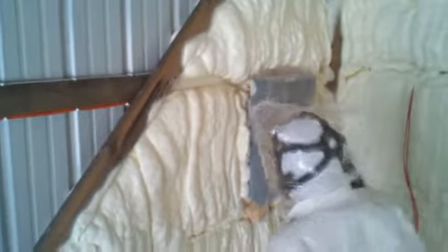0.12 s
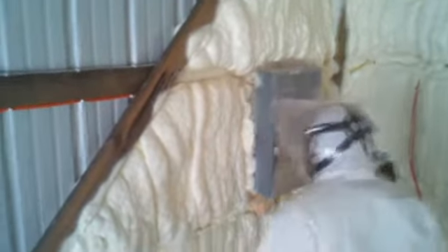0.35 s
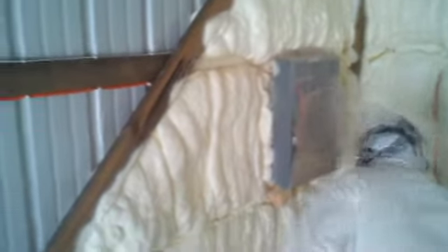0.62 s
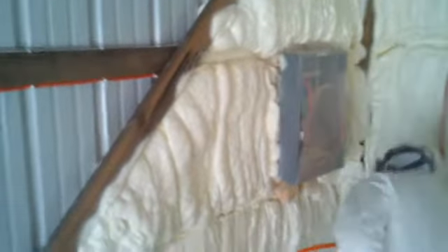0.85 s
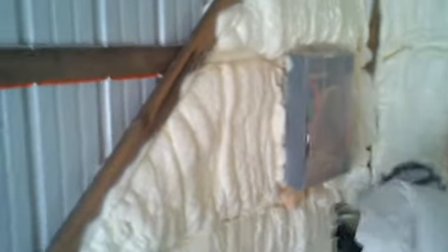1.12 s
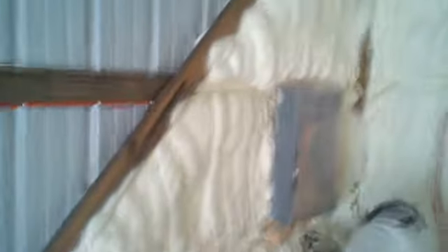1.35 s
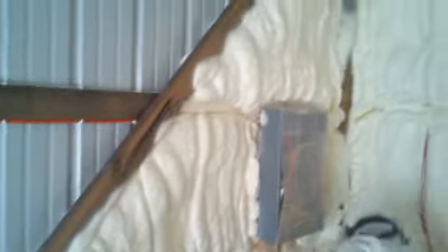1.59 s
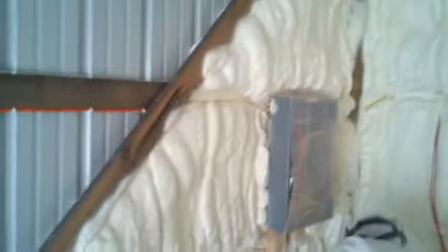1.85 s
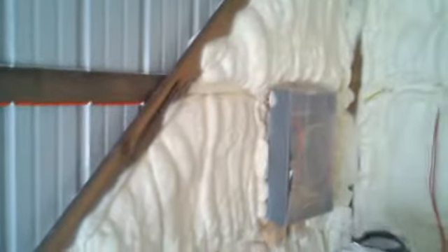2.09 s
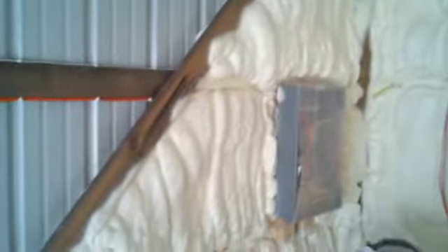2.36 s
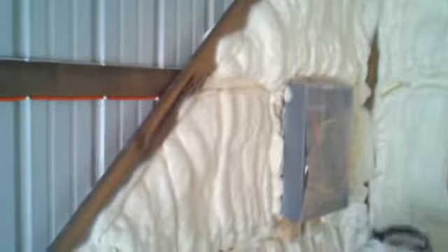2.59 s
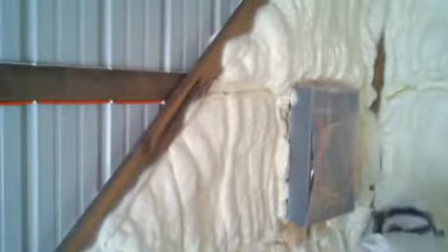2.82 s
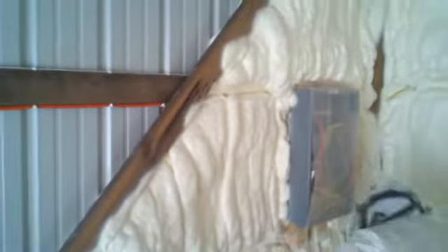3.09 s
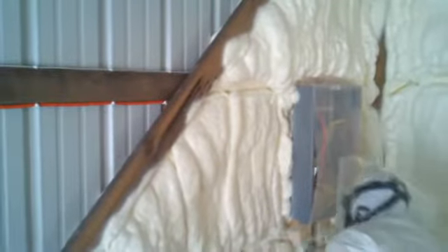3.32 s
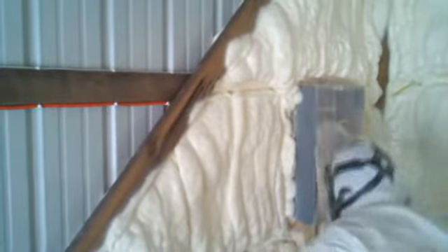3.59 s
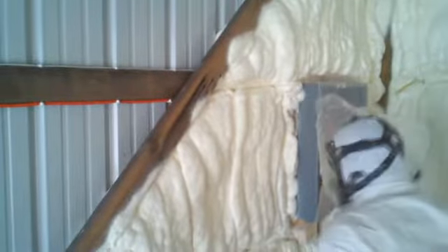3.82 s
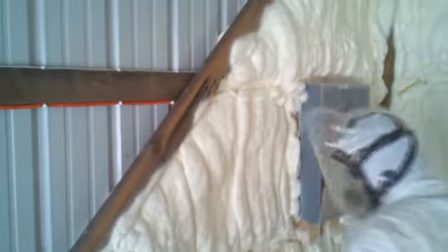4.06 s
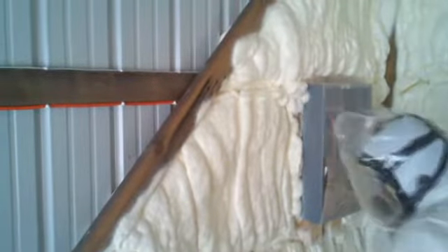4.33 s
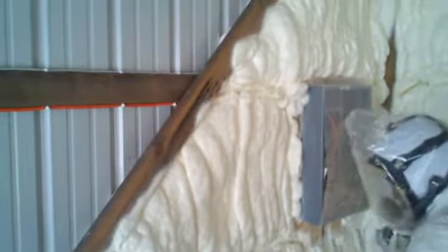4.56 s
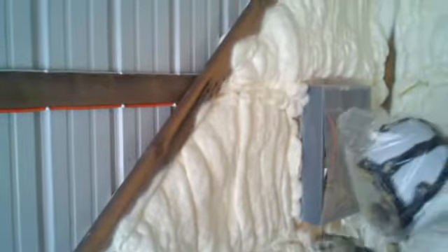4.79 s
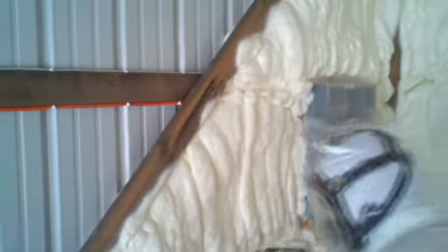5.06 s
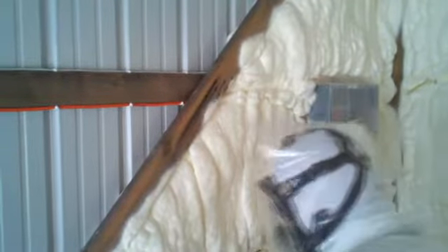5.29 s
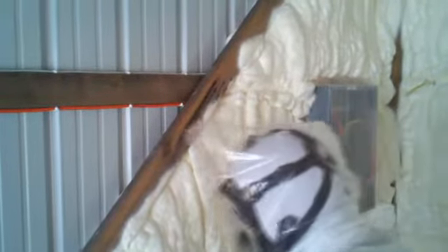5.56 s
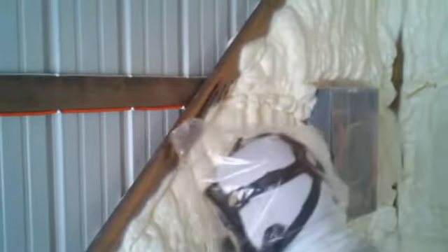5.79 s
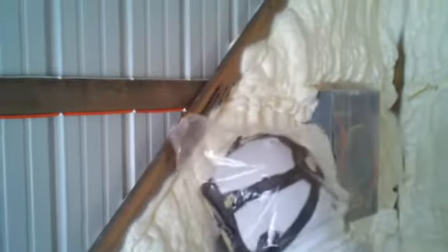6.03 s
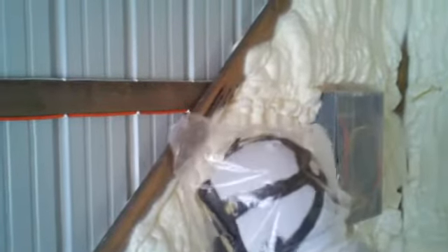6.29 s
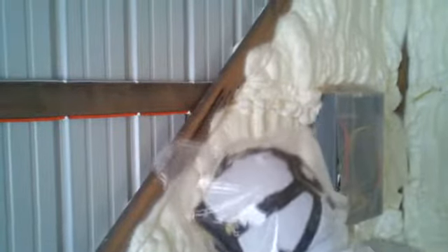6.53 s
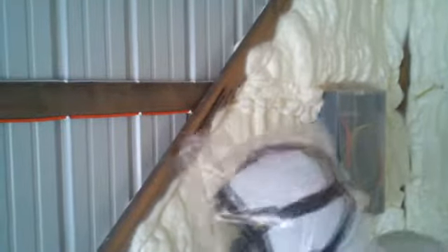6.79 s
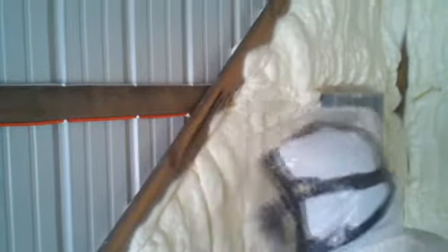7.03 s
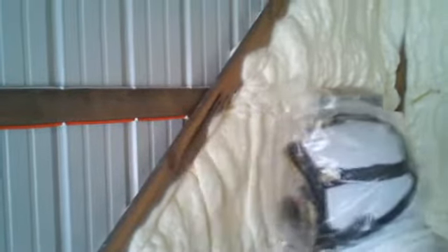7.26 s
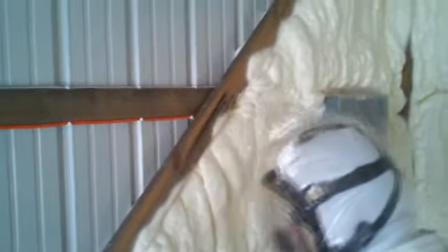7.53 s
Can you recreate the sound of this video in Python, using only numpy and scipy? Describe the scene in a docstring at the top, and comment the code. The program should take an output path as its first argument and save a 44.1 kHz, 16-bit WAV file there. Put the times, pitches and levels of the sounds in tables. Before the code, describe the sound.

Steady high compressed-air hiss close to a small camera, over low engine hum, pump tones and soft rumble from outside. Early on, three rapid foam puffs sputter; later a double burst, then a firmer series with sharp valve clacks, the hardest a little past five seconds. The hiss sags after some bursts and swells back. The room sounds dry and padded, the stereo wide and slightly phasey.

```python
"""Spray gun in a foam-lined shed

Close by, a spray gun leaks purge air in a bright hiss: flickering bands of noise that spit, sag and recover.
Trigger pulls throw foam at the wall of the metal shed: lumpy noise bursts, and knocks that ring the gun body.
Outside, an engine and pumps hum: sines on one shaft speed over broad rumble. Once, a short rough squeak.
A small camera hears it with two microphones and widens the image by delayed cross-feed."""
import sys
import numpy as np
from scipy import signal
from scipy.io import wavfile
from scipy.ndimage import uniform_filter1d

SR = 44100
rng = np.random.default_rng(int(sys.argv[2]) if len(sys.argv) > 2 else 0)


def generate_wav(signal):
    """Clip the signal to [-1, 1] and save it as 16-bit WAV at the path in sys.argv[1]."""
    frames = np.transpose(np.atleast_2d(signal))
    scaled = np.clip(frames, -1, 1) * 32767
    pcm = np.round(scaled).astype(np.int16)
    wavfile.write(sys.argv[1], SR, pcm)


def field_ratio(decibels):
    """Amplitude ratio for a level in dB (20 dB per decade); scalars and array-likes work."""
    return 10 ** (np.asarray(decibels, dtype=float) / 20)


N = 336924
STEP = 40   # samples between points of slow chance
ENGINE_CYCLE_HZ = 15.625   # the firing-cycle rate at which the pump tones have their listed pitch

# Likeness of the two microphone ports in a diffuse field. Each row: frequency in Hz, correlation.
PORT_LIKENESS = [(60, 0.56), (130, 0.68), (250, 0.72), (800, 0.58), (1300, 1), (2000, 0.058), (2650, -0.71),
                 (3300, 0.6), (3900, -0.28), (5200, 0.36), (6500, -0.24), (8000, 0.43), (9100, -0.24),
                 (11000, 0.19)]

# Machines outside, over time. Each row: time in seconds, then levels in dB of the hum, the rumble,
# engine order 16, engine order 26 and the main pump tone.
MACHINE_LEVELS = [(0.0, -47, -42.5, -43.5, -63, -49), (0.9, -44, -38.5, -41, -46.5, -48.5),
                  (2.3, -42.5, -39, -38.5, -44, -43), (2.9, -43.5, -39.5, -40.5, -42, -44.5),
                  (3.6, -45.5, -39.5, -46, -40, -45), (4.7, -47, -41, -48, -43.5, -43),
                  (5.1, -49, -40, -51, -44, -49.5), (5.7, -49, -40.5, -52, -42.5, -47.5),
                  (6.1, -51, -42.5, -55, -48.5, -48.5), (7.0, -50.5, -42.3, -49, -54, -45.5),
                  (7.64, -46, -40, -56, -50, -48.5)]
# Engine speed, which the pumps follow. Each row: time in seconds, firing cycles per second.
ENGINE_SPEED = [(0, 15.597), (2.0, 15.59), (2.9, 15.6), (3.15, 15.65), (5.9, 15.657), (6.3, 15.715),
                (7.64, 15.735)]
# Fainter engine tones. Each row: multiple of the cycle, level in dB over the hum,
# left-right balance in dB, radians by which the left lags.
ENGINE_ORDERS = [(4, -12, -2, 1.8), (8, 0, -4, .9), (12, -12, -4, .2), (20, -14, 0, .15), (24, -9, 0, 0),
                 (32, -12, 5, .3), (34, -12, -2, 0), (36, -9, 5, -.5), (40, -12, 0, .1), (47, -12, 2, .3),
                 (60, -15, 1, 0)]
# Fainter pump tones. Each row: frequency in Hz, level in dB over the hum,
# left-right balance in dB, radians by which the left lags.
FAINT_PUMP_TONES = [(142.7, -13.5, -4, .45), (285.3, -12, 2, .3)]
# Fade of the load orders. Each row: time in seconds, level in dB.
LOAD_ORDER_FADE = [(0, -2.5), (1.2, -1.7), (2.9, -5.4), (3.5, -4), (7.64, -8)]
# Spectrum of the machine rumble. Each row: frequency in Hz, relative density in dB per Hz.
RUMBLE_SPECTRUM = [(35, -22), (70, -10.5), (130, -10), (220, -2), (380, 2), (600, -9.5), (1000, -9.5),
                   (2000, -15), (3000, -27)]

# Slow level of the air jet as the gun moves. Each row: time in seconds, hiss level in dB.
JET_LEVEL = [(0.0, -23), (1.0, -22.5), (2.2, -22), (2.8, -22.5), (3.8, -21.5), (4.8, -23), (5.9, -21),
             (6.6, -24.5), (6.94, -22.5), (7.64, -22.5)]
# Spectrum of the air jet. Each row: frequency in Hz, relative density in dB per Hz.
HISS_SPECTRUM = [(1500, -18.5), (2500, -11), (4000, -13), (5500, -11), (7000, -7.5), (8500, -3.5),
                 (11000, -3), (14000, -1.5)]
# Spits of air, each with a sag of the hiss. Each row: time in seconds, spit in dB,
# sag in dB (negative swells), recovery time constant in seconds.
AIR_SPITS = [(1.40, 3.5, 6.5, .08), (1.54, 5, 1.5, 0.1), (3.29, 3.5, 4.5, 0.13), (4.85, 3.5, -3.3, .1),
             (4.99, 1, 4.5, 0.36), (5.35, 4, 5, 0.54), (5.97, 1.5, 3, 0.54)]

# Puffs of foam at the wall. Each row: start in seconds, held time in seconds, thud level in dB,
# spatter level in dB, sag in dB while held (negative swells).
FOAM_PUFFS = [(1.228, .11, -37.5, -39, 9), (1.351, 0.091, -35.5, -32.5, 8), (1.49, 0.045, -40, -36.5, 7),
              (3.175, 0.068, -34.5, -36, 10), (3.245, 0.072, -37, -27, 9.5), (4.834, 0.068, -40, -32.5, 9),
              (4.902, 0.083, -34.5, -35, -2.5), (5.20, .05, -50, -39, -0.5),
              (5.256, 0.14, -29.5, -27.5, 10.5), (5.729, 0.1, -40.5, -48, -4),
              (5.851, 0.07, -31.5, -28.5, 0.5)]
# Spectrum of the foam's dull thud. Each row: frequency in Hz, relative density in dB per Hz.
THUD_SPECTRUM = [(330, -2.5), (480, -9), (800, -5), (1150, -11.5)]
# Spectrum of the foam's spatter. Each row: frequency in Hz, relative density in dB per Hz.
SPATTER_SPECTRUM = [(1150, 3), (1600, 7.5), (2300, 1.5), (3000, -0.5), (3800, -10)]

# Knocks of the valve. Each row: time in seconds, click level in dB.
VALVE_KNOCKS = [(1.351, -34), (3.175, -33), (3.245, -25), (4.843, -24), (4.902, -19), (5.256, -12.5),
                (5.851, -20)]
# Short modes of the gun body. Each row: frequency in Hz, level in dB, 60 dB decay time in seconds.
GUN_BODY_MODES = [(600, 0, .008), (1550, -2, .006), (2400, -10, .005)]

# Narrow bands missing from the centre. Each row: frequency in Hz, half width in Hz,
# flicker of the width in dB, wander in Hz.
CENTRE_HOLES = [(2650, 180, 3.5, 60), (5200, 110, 7, 200), (7800, 35, 9, 120), (10400, 35, 9, 150),
                (13050, 35, 8, 120)]
# Narrow bands missing from the left-right difference. Each row: frequency in Hz, half width in Hz,
# flicker of the width in dB, wander in Hz.
WIDTH_HOLES = [(1270, 110, 3, 25), (3930, 190, 2.5, 40), (6550, 210, 3, 50), (9120, 190, 3, 50),
               (11650, 170, 5, 180)]


def rms_one(x):
    """Scale to rms 1."""
    return x / np.sqrt(np.mean(x ** 2) + 1e-20)


def in_time(rows):
    """Columns of a curve at every sample."""
    times, *columns = np.transpose(rows)
    return [np.interp(np.arange(N) / SR, times, column) for column in columns]


def at_hz(points, hz):
    """Read a table on a log-frequency axis."""
    table_hz, values = np.transpose(points)
    return np.interp(np.log(hz), np.log(table_hz), values)


def drift(rate):
    """Slow chance of spread 1, one point per STEP: noise through a double one-pole low-pass at rate Hz."""
    r = np.exp(-2 * np.pi * STEP * rate / SR)
    slow = signal.lfilter([1], [1, -2 * r, r * r], rng.standard_normal(N // STEP + 2002))
    return rms_one(slow[2000:])     # without the settling of the filter


def fine(slow):
    """Slow points read at every sample."""
    return np.interp(np.arange(N) / STEP, np.arange(len(slow)), slow)


def delayed(x, lag_s):
    """Read a signal later, between samples."""
    return np.interp(np.arange(N) - lag_s * SR, np.arange(N), x)


def banded_noise(spectrum, count, shared_db, own_db, rate):
    """Bands of stereo noise, each with its level, likeness and flicker; rms 1."""
    out, together = 0, drift(rate)
    edges = np.geomspace(spectrum[0][0], spectrum[-1][0] * 1.166, count + 1)
    white = rng.standard_normal((2, 2, N))      # neighbouring bands get unrelated noise
    for k, (low, high) in enumerate(zip(edges, edges[1:])):
        band = signal.butter(2, [low, high], "band", fs=SR, output="sos")
        mid, side = signal.sosfilt(band, white[k % 2])
        hz = np.sqrt(low * high)
        alike = np.clip(at_hz(PORT_LIKENESS, hz), -1, 1)
        flicker_db = shared_db * together + own_db * drift(rate)
        gain = fine(field_ratio(at_hz(spectrum, hz) + flicker_db))
        out = out + gain * (np.sqrt(1 + alike) * mid + np.sqrt(1 - alike) * side * [[1], [-1]])
    return rms_one(out)


def tone(phase, level_db, pan_db, lag, waver_db):
    """A wavering sine that reaches the two ports with its own balance and phase."""
    sides = np.array([[1], [-1]]) / 2
    waver = fine(field_ratio(waver_db * drift(2.07)))
    return np.sqrt(2) * field_ratio(level_db + pan_db * sides) * waver * np.sin(phase - lag * sides)


def load_orders(turn):
    """Under load every order from 22 to 61 shows faintly, and order 27 strongly; levels over the hum."""
    spread_db = 3
    fade_db, = in_time(LOAD_ORDER_FADE)
    comb = 0
    for k in range(22, 62):
        comb = comb + field_ratio(spread_db * rng.standard_normal()) * np.sin(k * turn + rng.uniform(0, 2 * np.pi))
    return field_ratio(-15 + fade_db) * comb + tone(27 * turn, -2 + fade_db, 0., 0., waver_db=0.5)


def machines():
    """Engine orders on one slightly unsteady shaft, pump tones, and broad rumble."""
    pump_main_hz = 369.7
    hum_db, rumble_db, sixteenth_db, twenty_sixth_db, pump_db = in_time(MACHINE_LEVELS)
    cycle_hz, = in_time(ENGINE_SPEED)
    turn = 2 * np.pi * np.cumsum(cycle_hz * (1 + 0.00033 * fine(drift(1.0)))) / SR
    # phase of a 1 Hz pump tone, which follows the engine with an unsteadiness of its own
    pump_turn = 2 * np.pi * np.cumsum(cycle_hz / ENGINE_CYCLE_HZ * (1 + 0.00043 * fine(drift(0.76)))) / SR

    hum = load_orders(turn)
    for k, level_db, pan_db, lag in ENGINE_ORDERS:
        hum += tone(k * turn + rng.uniform(0, 2 * np.pi), level_db, pan_db, lag, waver_db=1.3)
    for hz, level_db, pan_db, lag in FAINT_PUMP_TONES:
        hum += tone(hz * pump_turn, level_db, pan_db, lag, waver_db=2.)

    strong = tone(16 * turn, sixteenth_db, .7, 0., waver_db=.4)
    strong += tone(26 * turn, twenty_sixth_db, .4, 0., waver_db=.4)
    strong += tone(pump_main_hz * pump_turn, pump_db, -3., .2, waver_db=2.2)
    # at two thirds of the main pump tone, beating against order 16
    strong += tone(pump_main_hz * 2 / 3 * pump_turn, -55.5, .7, 0., waver_db=1.)
    rumble = banded_noise(RUMBLE_SPECTRUM, count=10, shared_db=.2, own_db=.6, rate=5.0)
    return field_ratio(hum_db) * hum + strong + field_ratio(rumble_db) * rumble


def air_jet():
    """Smooth bright turbulence that flutters a little; it spits, sags and recovers."""
    spit_rise_s, spit_fall_s, sag_onset_s = .04, .028, .035     # time constants
    hiss = banded_noise(HISS_SPECTRUM, count=12, shared_db=0.0, own_db=1.68, rate=11.8)
    level_db, = in_time(JET_LEVEL)
    for s, spit_db, sag_db, recovery_s in AIR_SPITS:
        since = np.arange(N) / SR - s
        after = np.maximum(since, 0)
        spit = np.exp(np.minimum(since, 0) / spit_rise_s - after / spit_fall_s)
        sag = (1 - np.exp(-after / sag_onset_s)) * np.exp(-after / recovery_s)
        level_db = level_db + spit_db * spit - sag_db * sag
    balance = field_ratio([[-.2], [.2]])    # a touch to the right
    return field_ratio(level_db) * balance * hiss


def foam():
    """Lumpy noise while the trigger is held, from the left, so it reaches that port first."""
    rise_s, fall_db_per_s = .008, 218
    thud = spatter = 0
    for s, held_s, thud_db, spatter_db, sag_db in FOAM_PUFFS:
        since = np.arange(N) / SR - s
        sag = sag_db * np.clip(since / held_s, 0, 1)
        fall = fall_db_per_s * np.maximum(since - held_s, 0)
        shape = np.clip(since / rise_s, 0, 1) * field_ratio(-sag - fall)
        thud = thud + field_ratio(thud_db) * shape
        spatter = spatter + field_ratio(spatter_db) * shape
    low = thud * banded_noise(THUD_SPECTRUM, count=4, shared_db=1.0, own_db=1.5, rate=50.0)
    high = spatter * banded_noise(SPATTER_SPECTRUM, count=5, shared_db=1.0, own_db=1.5, rate=50.0)
    left, right = low + high
    return np.array([left, delayed(right, .00009)])


def valve():
    """Each knock and its quick rebound strike the short modes of the gun body."""
    rebound_s = .001
    at = [round(s * SR) for s, db in VALVE_KNOCKS]
    knock_db = np.array(VALVE_KNOCKS)[:, 1]
    ring = np.zeros(N)
    for hz, level_db, t60 in GUN_BODY_MODES:
        clicks = np.full(N, 1e-18)
        clicks[at] = field_ratio(knock_db + level_db)
        r, w = field_ratio(-60 / (t60 * SR)), 2 * np.pi * hz / SR
        ring += signal.lfilter([.5, 0, -.5], [1, -2 * r * np.cos(w), r * r], clicks)
    soft_contact = signal.butter(4, 2800, fs=SR, output="sos")
    ring = signal.sosfilt(soft_contact, ring)
    left = delayed(ring - .7 * delayed(ring, rebound_s), .0008)
    return np.array([left, delayed(left, 0.00013)])     # it reaches the left port first


def squeak():
    """One short rough chirp: noise in a narrow band under a rounded swell."""
    start_s, length_s, centre_hz, width_hz, level_db = 4.543, .045, 2000, 120, -39
    edges = [centre_hz - width_hz / 2, centre_hz + width_hz / 2]
    band = signal.butter(2, edges, "band", fs=SR, output="sos")
    swell = np.sin(np.pi * np.clip((np.arange(N) / SR - start_s) / length_s, 0, 1))
    return field_ratio(level_db) * swell * rms_one(signal.sosfilt(band, rng.standard_normal(N)))


def scene():
    """All sources at the two microphone ports."""
    return machines() + air_jet() + foam() + valve() + squeak()


def with_holes(x, holes):
    """Narrow bands drop out of the sound, with edges that flicker by chance."""
    grid, times, cells = signal.stft(x, SR, nperseg=2048)
    for hz, width, flicker_db, wander in holes:
        chance = uniform_filter1d(rng.standard_normal((2, len(times))), size=3) * np.sqrt(3)
        wide, aside = np.clip(chance, -2, 2)
        near = slice(*np.searchsorted(grid, [hz - 1200, hz + 1200]))
        off = (grid[near, None] - hz - wander * aside) / (width * field_ratio(flicker_db * wide))
        cells[near] *= field_ratio(-50.0 * np.exp(-off ** 4))       # 50 dB down in the middle
    return signal.istft(cells, SR, nperseg=2048)[1][:N]


def roll_off(x):
    """The treble ends steeply here."""
    return signal.sosfilt(signal.butter(12, 15310, fs=SR, output="sos"), x)


def record(dry):
    """Each side loses a delayed share of the other, which widens the image; bands drop out; the top is cut."""
    share, lag = .39, 17    # lag in samples
    crossed = np.pad(dry[::-1], ((0, 0), (lag, 0)))[:, :N]
    left, right = dry - share * crossed
    centre = with_holes(left + right, CENTRE_HOLES) / 2
    width = with_holes(left - right, WIDTH_HOLES) / 2
    top_cut = signal.ellip(14, .5, 70, 13950, fs=SR, output="sos")
    mix = signal.sosfilt(top_cut, [centre + width, centre - width])
    return roll_off(mix)


dry = scene()
out = record(dry)
generate_wav(out)
```